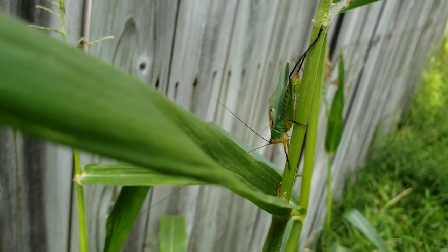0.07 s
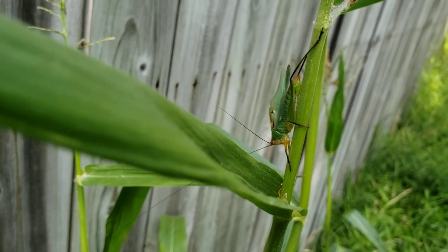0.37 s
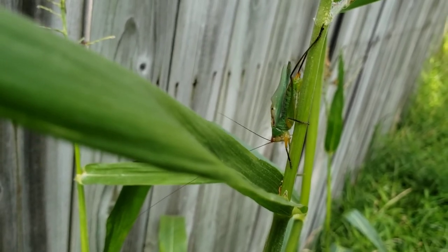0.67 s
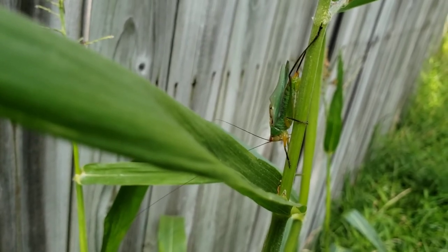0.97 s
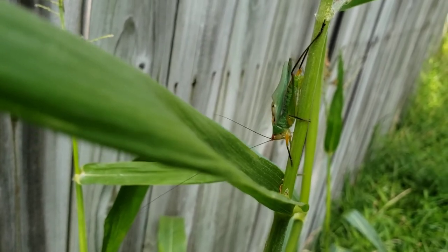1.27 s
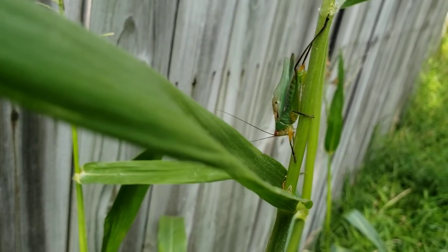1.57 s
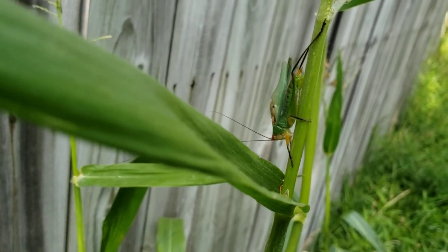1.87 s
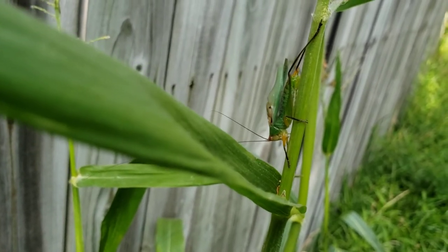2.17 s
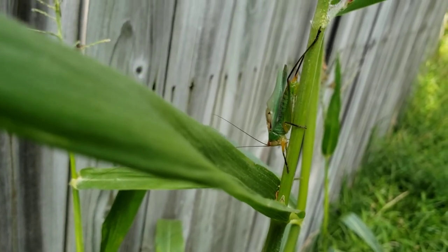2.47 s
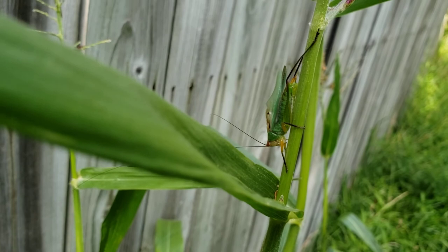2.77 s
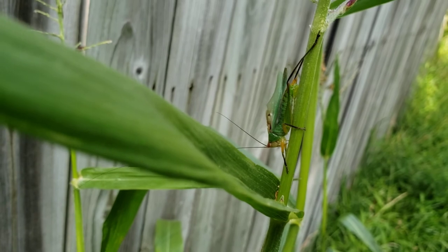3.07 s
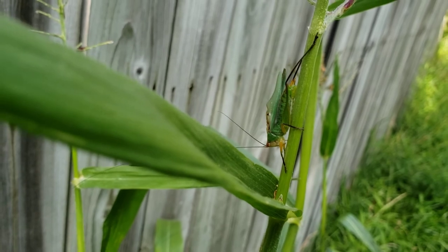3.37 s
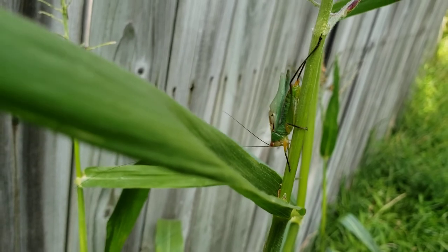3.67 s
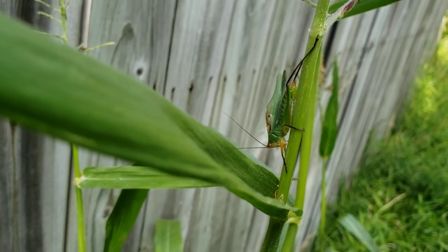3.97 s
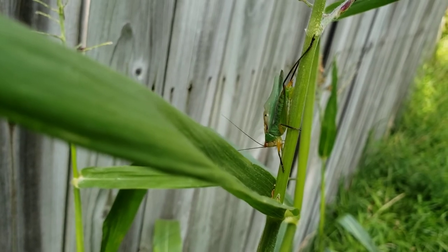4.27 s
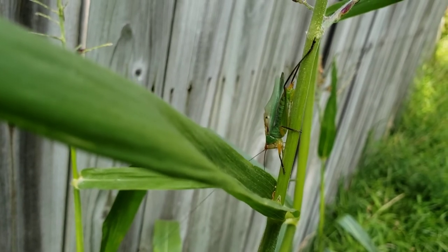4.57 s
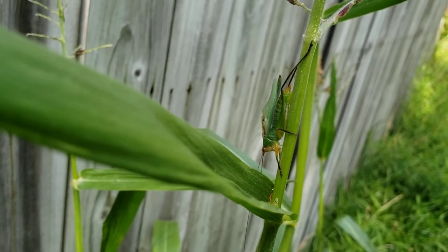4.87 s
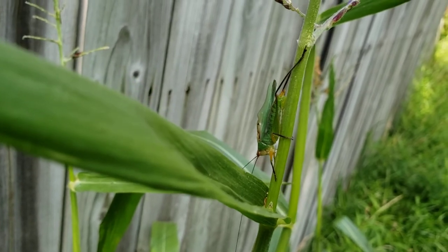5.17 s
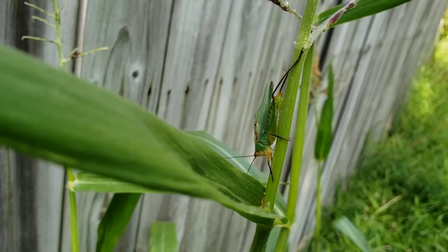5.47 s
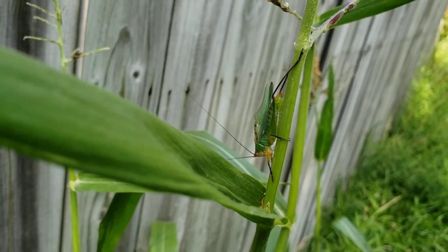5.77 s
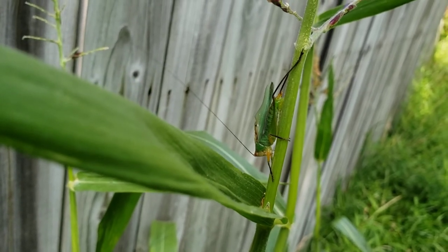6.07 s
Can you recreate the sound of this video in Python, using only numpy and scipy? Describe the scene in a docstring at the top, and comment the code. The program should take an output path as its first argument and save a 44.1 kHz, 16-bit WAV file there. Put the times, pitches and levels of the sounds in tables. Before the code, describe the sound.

Quick ticks lead into swelling, very high buzzes from a nearby katydid, while fainter insects trill and chirp over far-off engines.

```python
"""A meadow, close to a grass stem: a katydid gives a few sharp ticks, then a swelling buzz.
Each wing stroke drags a toothed file over a scraper and rings the wing; stem and leaves echo it.
Farther off, a second katydid sings the same way and two crickets trill and chirp in falling tone pulses.
Behind them are a shimmer of far insects and the low drone of distant engines and tyres."""
import sys
import numpy as np
from scipy import signal
from scipy.fft import rfft, irfft, next_fast_len
from scipy.io import wavfile
from scipy.ndimage import uniform_filter1d, minimum_filter1d, map_coordinates

SR = 44100
rng = np.random.default_rng(int(sys.argv[2]) if len(sys.argv) > 2 else 0)


def persist_wave(psi):
    """Save psi, clipped to +-1, as 16-bit WAV."""
    counts = np.round(np.clip(psi, -1, 1) * 32767).astype(np.int16)
    wavfile.write(sys.argv[1], SR, np.atleast_2d(counts).T)


N = 278271
TIME = np.arange(N) / SR
STROKE_HZ = 42.4  # wing strokes in a near buzz
# light contact throughout a stroke, on the main, upper and low wing mode: level/dB
CONTACT_DB = [-33, -31, -49]


def amp(db):
    """Decibels to gain."""
    return 10 ** (np.asarray(db) / 20)


def unit(x):
    """x at rms 1."""
    return x / np.sqrt(np.mean(x ** 2) + 1e-20)


def along(points, hz):
    """Interpolate (f/Hz, value) points on a log axis."""
    f, values = np.transpose(points)
    return np.interp(np.log(hz + 1), np.log(f + 1), values)


def curves(rows):
    """One value per sample for each column after the time."""
    times, *columns = np.transpose(rows)
    return [np.interp(TIME, times, column) for column in columns]


def around(centre_s, width_s):
    """Slice of the samples in a time window."""
    return slice(*np.searchsorted(TIME, [centre_s - width_s / 2, centre_s + width_s / 2]))


def wobble(rate_hz):
    """Smooth random curve, rate_hz knots a second."""
    return map_coordinates(rng.standard_normal(int(N * rate_hz / SR) + 4), [TIME * rate_hz])


def filtered(x, response):
    """x through a complex frequency response."""
    size = next_fast_len(N + SR // 2)
    return irfft(rfft(x, size) * response(np.fft.rfftfreq(size, 1 / SR)), size)[..., :N]


def delay(hz, seconds):
    """Response of a pure delay."""
    return np.exp(-2j * np.pi * hz * seconds)


def ring(x, spectrum, size=1024):
    """x through a minimum-phase body with this spectrum and unit energy."""
    cepstrum = irfft(np.log(amp(along(spectrum, np.fft.rfftfreq(size, 1 / SR)))))
    body = irfft(np.exp(rfft(2 * cepstrum[:size // 2], size) - cepstrum[0]))
    return signal.fftconvolve(x, body / np.linalg.norm(body))[:N]


def noise(spectrum, correlation):
    """Coloured stereo noise at rms 1."""
    mid, side = filtered(rng.standard_normal((2, N)), lambda hz: amp(along(spectrum, hz)))
    side = side * np.tan(np.arccos(correlation) / 2)
    return unit(np.array([mid + side, mid - side]))


def near_katydid():
    """Tooth impacts ring three wing modes; short echoes comb the song at the two microphone ports."""
    # ticks: t/s, length/s, level/dB
    tick_events = [(1.617, 0.0093, -18), (1.697, 0.009, -12), (1.7725, 0.0105, -13),
                   (1.8477, 0.0125, -11.5), (3.7105, 0.0089, -15), (3.803, 0.012, -15.5),
                   (3.883, 0.0105, -14.5)]
    # wing resonances: f/Hz, level/dB
    main_mode = [(4000, -68), (6500, -43), (7900, -41), (8900, -28.5), (10200, -21.5), (11200, -6.5),
                 (11900, -1.5), (12550, 2.5), (13200, 1), (14500, -8.5), (16500, -30)]
    upper_mode = [(6000, -55), (9000, -30), (12500, -16), (13700, -3), (14400, 0), (15100, -2), (15700, -2),
                  (16500, -16)]
    low_mode = [(4000, -55.5), (4700, -9), (5300, -9), (5750, 2.5), (6300, -3), (8000, -11.5), (11000, -18)]
    # echoes off stem and leaves: delay/s, left gain, right gain
    echoes = [(.00134, .13, 0), (.001436, 0, .14), (.001594, .17, .33), (.001678, 0, .12),
              (.002882, .11, .08), (.00323, .09, .1)]
    # shading of the right port: f/Hz, level/dB
    shade = [(5000, -3), (7000, -4), (7900, -12), (8600, -3), (11300, -3), (12700, -6), (14000, -7.5),
             (15700, -6)]
    # right port behind left: f/Hz, lag/rad
    port_lag = [(100, .6), (8700, .5), (10400, 1), (11200, 2.1), (11900, 4.3), (13400, 4.5), (14600, 5.4),
                (16000, 5.8)]
    # send into the plants, widest for low notes: f/Hz, level/dB
    spread = [(7000, -5), (10300, -3.5), (12000, -15.5)]

    def left_port(hz):
        return 1 + sum(gain * delay(hz, s) for s, gain, _ in echoes)

    def right_port(hz):
        comb = 1 + sum(gain * delay(hz, s) for s, _, gain in echoes)
        return amp(along(shade, hz)) * np.exp(-1j * along(port_lag, hz)) * comb

    modes = [main_mode, upper_mode, low_mode]
    strokes = near_strokes()
    buzz = amp(-3) * stroke_force(strokes, stretch=.98, scatter_db=.5)
    ticks = amp([[-2], [-.5], [-39]]) * tick_force(tick_events, release_s=.004)  # a row per mode
    teeth = file_teeth(file_speed(strokes), jitter=.07, scatter_db=1.2, mode_count=len(modes))
    song = sum(ring(drive, mode) for drive, mode in zip((buzz + ticks) * teeth, modes))
    close = amp([[1.4], [1.9]]) * np.array([filtered(song, left_port), filtered(song, right_port)])
    diffuse = plant_reverb(filtered(song, lambda hz: amp(along(spread, hz))))
    return close + diffuse + dull_rasp(buzz[0], ticks[0]) + dull_taps(strokes)


def near_strokes(swell_s=.1, tire_db_per_s=.5, drag_strokes=1.4):
    """Strokes (t/s, level/dB): a buzz swells, slowly tires and drags at the end; the file may slip."""
    # buzzes: first t/s, last t/s, mid-buzz lead/s, final lag/s, full level/dB, swell depth/dB
    buzzes = [(.0095, .465, 0.00086, 0.00039, -14.5, -1), (1.8905, 3.314, 0.0045, 0.01, -12, 15),
              (3.9312, 4.904, 0.00071, 0.01, -12.5, 14)]
    # strokes where the file barely catches: t/s, change/dB
    slips = [(0.08, -5), (0.44, -1.5), (2.242, -3), (2.64, -2), (2.947, -5), (3.043, -6), (4.329, -7),
             (4.517, -3.5), (4.682, -9), (4.849, -1.5)]
    strokes = []
    for first_s, last_s, lead_s, lag_s, db, swell_db in buzzes:
        length_s = last_s - lag_s - first_s
        count = round(length_s * STROKE_HZ) + 1
        progress = np.linspace(0, 1, count)
        hurry = 1 - (2 * progress - 1) ** 2
        drag = np.exp((progress - 1) * (count - 1) / drag_strokes)
        times = first_s + progress * length_s - lead_s * hurry + lag_s * drag
        age_s = times - first_s
        levels_db = db - tire_db_per_s * age_s - swell_db * np.exp(-age_s / swell_s)
        levels_db[-1] -= 3
        for s, slip_db in slips:
            levels_db[np.abs(times - s) < .5 / STROKE_HZ] += slip_db
        strokes += zip(times, levels_db)
    return strokes


def stroke_force(strokes, stretch, scatter_db, jitter_s=.0004):
    """Drive of each wing mode; every stroke is a little early or late, strong or weak."""
    # catch, closing, bright scrape, soft reopening:
    # t/s from stroke centre, rise/s, fall/s, level/dB on the main, upper and low mode
    phases = [(-.0078, .0013, .003, -20, -13, -52), (-.0018, .0037, .0037, .5, -11, -44.5),
              (.0027, .0013, .001, -13, 1.8, -47), (.01, .0012, .0012, -26, -28, -33)]
    force = np.zeros((len(CONTACT_DB), N))
    for (s, db), (late, loud) in zip(strokes, rng.standard_normal((len(strokes), 2))):
        centre_s = s + jitter_s * late
        span = around(centre_s, stretch / STROKE_HZ)
        offset_s = (TIME[span] - centre_s) / stretch
        shape = amp(CONTACT_DB)[:, None]
        for peak_s, rise_s, fall_s, *modes_db in phases:
            width_s = np.where(offset_s < peak_s, rise_s, fall_s)
            bump = np.exp(-.5 * ((offset_s - peak_s) / width_s) ** 2)
            shape = shape + np.outer(amp(modes_db), bump)
        force[:, span] += amp(db + scatter_db * loud) * shape
    return force


def tick_force(ticks, release_s):
    """A tick is one stroke at full force from its first tooth."""
    return sum(amp(db) * (TIME >= s) * np.clip((s + length_s - TIME) / release_s + .5, 0, 1)
               for s, length_s, db in ticks)


def file_speed(strokes, tick_tooth_hz=1513.4):
    """Tooth rate: even in a tick, rising through each stroke of a buzz."""
    # the file speeds up as the wings close: t/s from stroke centre, tooth rate/Hz
    tooth_rate = [(-.0085, 940), (-.0015, 1630)]
    tooth_hz = np.full(N, tick_tooth_hz)
    for s, _ in strokes:
        span = around(s, 1 / STROKE_HZ)
        tooth_hz[span] = np.interp(TIME[span] - s, *np.transpose(tooth_rate))
    return tooth_hz


def file_teeth(tooth_hz, jitter, scatter_db, mode_count=1, max_lag_s=.00006):
    """Unevenly spaced teeth hit the scraper; each impact reaches each mode after a tiny random lag."""
    gap, loud = rng.standard_normal((3 * N // 20, 2)).T
    teeth_passed = np.cumsum(tooth_hz * np.ones(N)) / SR
    struck = np.searchsorted(teeth_passed, np.cumsum(np.exp(jitter * gap)))
    lags = np.round(max_lag_s * SR * rng.random((mode_count, len(struck)))).astype(int)
    impacts = [np.bincount(at[at < N], amp(scatter_db * loud[at < N]), N) for at in struck + lags]
    return unit(np.array(impacts))


def dull_rasp(buzz, ticks, flicker_db=2.2):
    """Faint, uneven, dull noise that follows the buzz and ticks, mostly on the left."""
    # rasp: f/Hz, level/dB
    spectrum = [(150, -13.5), (400, 7), (800, 2.5), (1550, -1), (2250, -6.5), (2700, 4), (3500, -32.5),
                (4500, -22), (7000, -63.5)]
    envelope = uniform_filter1d(buzz, size=int(SR / STROKE_HZ)) + amp(-1) * ticks
    gain = amp(-45 + flicker_db * wobble(90))
    return gain * envelope * amp([[0], [-10]]) * noise(spectrum, correlation=.13)


def dull_taps(strokes, lead_s=.0019, width_s=.0017, gain_db=-46.8, scatter_db=1.8, snap_db=15.5):
    """A dull tap near each stroke's loudest moment: a snap inside a brief rustle."""
    # tap: f/Hz, level/dB
    spectrum = [(150, -29.5), (400, -1.5), (800, 1), (1600, -2), (2250, -12), (2700, -10), (3500, -26),
                (4500, -25.5), (7000, -52)]
    rustle, snaps = np.zeros(N), np.zeros(N)
    for (s, db), loud in zip(strokes, rng.standard_normal(len(strokes))):
        tap_s = s - lead_s
        strength = amp(db + gain_db + scatter_db * loud)
        span = around(s, 1 / STROKE_HZ)
        rustle[span] += strength * np.exp(-np.abs(TIME[span] - tap_s) / width_s)
        snaps[round(tap_s * SR)] = strength * amp(snap_db)
    return amp([[0], [-8]]) * (rustle * noise(spectrum, correlation=.1) + ring(snaps, spectrum))


def dry_clicks(t60_s=.006):
    """Two dry, broadband clicks, one on a loud tick, one within a buzz."""
    # clicks: t/s, level/dB
    clicks = [(1.7735, -36.5), (3.018, -44)]
    # click colour: f/Hz, level/dB
    spectrum = [(100, -14), (400, 0), (1500, -1), (4000, 1), (9000, 10.5), (16000, -18)]
    envelope = sum(amp(db - 60 * np.maximum(TIME - s, 0) / t60_s) * (TIME > s) for s, db in clicks)
    return envelope * noise(spectrum, correlation=.22)


def far_katydid(tick_s=.0094):
    """A quicker file and scraper, heard mostly by way of the plants and the fence."""
    # ticks: t/s, level/dB
    tick_events = [(.672, -50), (0.73, -49), (.795, -48.5), (.857, -51), (3.668, -45), (3.764, -63),
                   (5.249, -48.5), (5.314, -46), (5.381, -46.5), (5.453, -47.5)]
    # wing resonance: f/Hz, level/dB
    wing = [(6000, -45.5), (9400, -15.5), (10400, -7.5), (11400, 2.5), (12800, 1.5), (14500, 7.5),
            (15400, 4.5), (16000, -14.5)]
    buzz = stroke_force(far_strokes(), stretch=1, scatter_db=1.5)[0]
    ticks = tick_force([(s, tick_s, db) for s, db in tick_events], release_s=.013)
    teeth = file_teeth(tooth_hz=1923, jitter=.16, scatter_db=3)[0]
    song = ring((buzz + ticks) * teeth, wing)
    return amp(-18.5) * song + amp(5) * plant_reverb(song)


def far_strokes(stroke_hz=59.4, swell_s=.054, swell_db=23, growth_db_per_s=4):
    """Even strokes (t/s, level/dB) that swell quickly, then go on growing."""
    # buzzes: start/s, end/s, level/dB
    buzzes = [(0.908, 1.8, -53.5), (2.413, 3.4, -54.5), (3.793, 4.8, -40.5), (5.478, 6.4, -51)]
    return [(start_s + age_s, db + growth_db_per_s * age_s - swell_db * np.exp(-age_s / swell_s))
            for start_s, end_s, db in buzzes for age_s in np.arange(0, end_s - start_s, 1 / stroke_hz)]


def trilling_cricket(pitch_hz=5290, pulse_hz=71, fall=.152, width=.14, skip_share=.07, skip_db=-8):
    """Each quick wing stroke is a short falling tone; the trill surges and some strokes barely catch."""
    # trill: t/s, level/dB
    levels = [(0, -54), (.6, -59), (1.6, -53.5), (3.5, -51), (5.05, -55.5), (5.7, -49), (6.31, -47.5)]
    level_db, = curves(levels)
    cycles = np.cumsum(pulse_hz * (1 + .015 * wobble(15))) / SR
    pulse = cycles.astype(int)
    offset = cycles % 1 - .5  # from pulse centre; in periods, like width
    stroke_db = 1.2 * rng.standard_normal(1000) + skip_db * (rng.random(1000) < skip_share)
    hz = pitch_hz * (1 - fall * offset + .004 * wobble(300))
    phase = 2 * np.pi * (np.cumsum(hz) / SR + rng.random(1000)[pulse])
    surge_db = 1.5 * wobble(9)
    envelope = amp(level_db + surge_db + stroke_db[pulse]) * np.exp(-.5 * (offset / width) ** 2)
    song = envelope * (np.sin(phase) + amp(-17) * np.sin(2 * phase))
    return song * amp([[-2], [1.5]]) + amp(-15) * plant_reverb(song)


def chirping_cricket(pitch_hz=4670, fall_per_s=1.5, spacing_s=.049, width_s=.0055, rough_rad=1):
    """Three soft, slightly falling pulses to a chirp, the first weaker."""
    # chirps: t/s, pulse level/dB
    chirps = [(0.035, -60), (.545, -61.5), (1.051, -61.5), (1.572, -59.5), (2.16, -57), (2.729, -56.5),
              (3.328, -58.5), (3.919, -58), (4.47, -57), (5.139, -57.5), (5.744, -58)]
    envelope, offset_s = np.zeros(N), np.zeros(N)
    for s, chirp_db in chirps:
        for k, db in enumerate([chirp_db - 2, chirp_db, chirp_db]):
            centre_s = s + spacing_s * k
            span = around(centre_s, spacing_s)
            offset_s[span] = TIME[span] - centre_s
            envelope[span] = amp(db + rng.normal(0, 1)) * np.exp(-.5 * (offset_s[span] / width_s) ** 2)
    hz = pitch_hz * (1 - fall_per_s * offset_s + .004 * wobble(32))
    song = envelope * np.sin(2 * np.pi * np.cumsum(hz) / SR + rough_rad * wobble(200))
    return song + amp(-4) * plant_reverb(song)


def plant_reverb(x, sway_s=.2):
    """Diffuse echo of fence and plants; as the plants sway, one tail gives way to the next."""
    # decay: f/Hz, t60/s
    decay = [(4000, .25), (10000, .1), (16000, .085)]
    step, length = int(sway_s * SR), SR // 4
    fade = np.sin(np.pi * (np.arange(2 * step) + .5) / (2 * step))
    x = np.pad(x, (step, 2 * step))
    out = np.zeros((2, N + 4 * step + 2 * length))
    for at in range(0, N + step, step):
        hz, t, bins = signal.stft(rng.standard_normal((2, length)), SR, nperseg=256)
        tail = signal.istft(bins * amp(-60 * t / along(decay, hz)[:, None]), SR, nperseg=256)[1]
        piece = fade * x[at:at + 2 * step]
        echo = signal.fftconvolve(piece[None], tail / np.linalg.norm(tail[0]), axes=1)
        out[:, at:at + echo.shape[1]] += echo
    return out[:, step:step + N]


def high_shimmer(low_cut_hz=3800, waver_db=2.8):
    """A slowly growing shimmer of distant insects; also a few faint, narrow, wavering high tones."""
    # shimmer: f/Hz, level/dB
    spectrum = [(3800, -36.5), (4700, -2.5), (5400, 11), (6300, -5.5), (7500, -10.5), (9500, -11.5),
                (10400, -5), (12000, -11), (15000, -7.5), (16200, -44)]
    # narrow tones: f/Hz, width/Hz, level/dB
    tones = [(5720, 140, -68.5), (7310, 300, -75.5), (8220, 170, -82), (9455, 270, -95.5), (9600, 130, -93)]
    level_db, = curves([(0, -65.5), (3.5, -62.5), (6.31, -60.5)])
    growth_db = level_db - level_db.mean()
    envelope = amp(level_db + wobble(23))
    out = envelope * filtered(noise(spectrum, correlation=.023), lambda hz: hz > low_cut_hz)
    for centre_hz, width_hz, db in tones:
        white = rng.standard_normal((2, N))
        tone = filtered(white, lambda hz: np.exp(-2 * ((hz - centre_hz) / width_hz) ** 2))
        out += amp(db + growth_db + waver_db * wobble(11)) * unit(tone)
    return out


def traffic(climb_power=.82, fade_s=.1):
    """Far engines hold or gather speed in a bed of rumble and tyre noise that slowly draws nearer."""
    # bed: t/s, rumble level/dB, tyre and air level/dB
    levels = [(0, -53, -74), (.4, -54.5, -78), (.7, -54, -78), (1.3, -54, -78.5), (1.9, -47, -76),
              (2.55, -51, -76), (3.6, -50.5, -77), (4.7, -51, -74), (5.85, -50.5, -72), (6.31, -44, -69)]
    # rumble, and tyre and air noise: f/Hz, level/dB
    rumble = [(13, -65), (22, -19), (55, -4.5), (80, 2), (108, -2), (135, -10), (169, -12), (198, -23),
              (269, -26), (330, -34.5), (430, -25.5), (730, -120)]
    tyres = [(120, -48.5), (200, -5.5), (236, -10), (316, -10), (568, -9), (697, -12.5), (1620, -23),
             (2690, -22), (3260, -38), (4200, -36.5), (5460, -71), (9240, -120)]
    # engines: start/s, end/s, first f/Hz, last f/Hz, level/dB, relative octave level/dB
    engines = [(0, .4, 165, 165, -67, -34), (.55, 2.02, 165, 166, -63, -34), (.95, 2.45, 82, 83, -61, -26),
               (1.3, 2.25, 116, 129, -63, -17), (2.55, 4.1, 92, 107, -55.5, -26),
               (4.95, 6.31, 77, 77, -56.5, -30), (5, 6.31, 114, 124, -57, -16.5)]
    rumble_db, tyre_db = curves(levels)
    out = amp(rumble_db - 4.5 + 1.8 * wobble(5)) * noise(rumble, correlation=.9)
    out += amp(tyre_db + 3.5 + 1.1 * wobble(4)) * noise(tyres, correlation=.09)
    for start_s, end_s, first_hz, last_hz, db, octave_db in engines:
        progress = np.clip((TIME - start_s) / (end_s - start_s), 0, 1)
        hz = first_hz + (last_hz - first_hz) * progress ** climb_power
        phase = 2 * np.pi * np.cumsum(hz * (1 + .0047 * wobble(8.6))) / SR
        fade = np.clip(np.minimum(TIME - start_s, end_s - TIME) / fade_s + 1, 0, 1)
        envelope = fade * amp(db + 1.3 * wobble(11))
        octave = amp(octave_db + 2.5 * wobble(14)) * np.sin(2 * phase)
        out += envelope * unit(np.sin(phase) + octave)
    return out


def bass_dip(x, threshold_db=-22, knee_db=3, depth_db=-35, edge_hz=280, lag_s=.096, size=4410):
    """The bass drops away on the left while that side stays loud."""
    left, right = x
    level_db = 10 * np.log10(np.abs(uniform_filter1d(left ** 2, size)) + 1e-12)
    sustained_db = uniform_filter1d(minimum_filter1d(level_db, size), size // 4)
    lagged_db = np.interp(TIME - lag_s, TIME, sustained_db)
    dip = np.clip((lagged_db - threshold_db) / knee_db, 0, 1)
    bass = filtered(left, lambda hz: 1 / (1 + (hz / edge_hz) ** 8))
    return np.array([left - (1 - amp(depth_db * dip)) * bass, right])


def limiter(x, ceiling, size=128):
    """Gain dips smoothly around peaks that would pass the ceiling."""
    gain = ceiling / np.maximum(np.abs(x).max(axis=0), ceiling)
    held = minimum_filter1d(gain, 2 * size)
    return x * uniform_filter1d(uniform_filter1d(held, size), size)


def scene():
    """All the singers, two clicks, the shimmer and the traffic."""
    return (near_katydid() + dry_clicks() + far_katydid() + trilling_cricket() + chirping_cricket()
            + high_shimmer() + traffic())


def record(dry):
    """Bass dip, limiter and steep low-pass."""
    cutoff_hz = 15790
    limited = limiter(bass_dip(dry), ceiling=.92)
    return filtered(limited, lambda hz: 1 / np.sqrt(1 + (hz / cutoff_hz) ** 600))


dry = scene()
out = record(dry)
persist_wave(out)
```